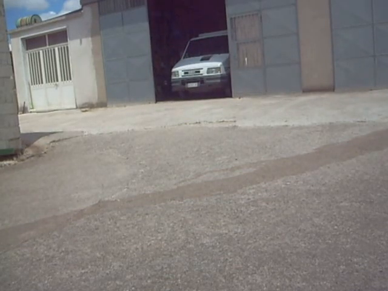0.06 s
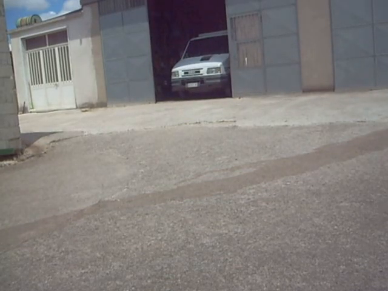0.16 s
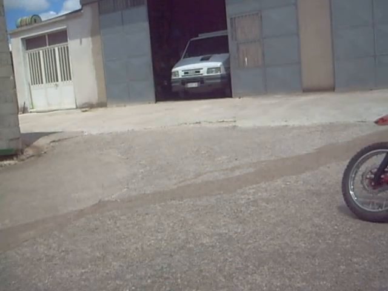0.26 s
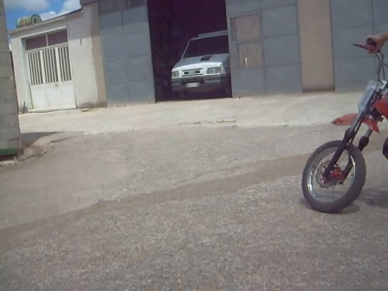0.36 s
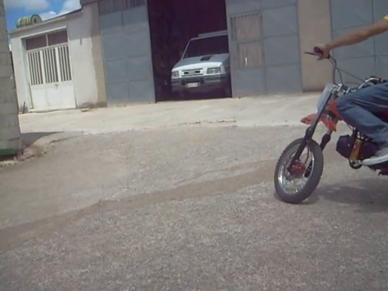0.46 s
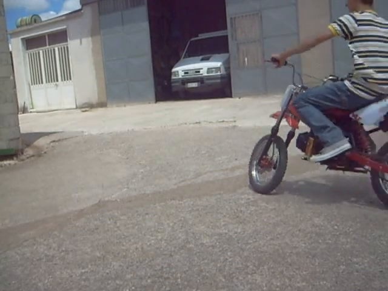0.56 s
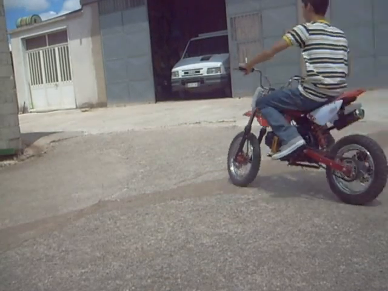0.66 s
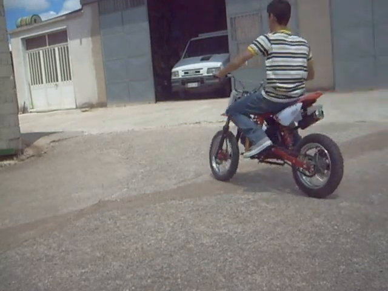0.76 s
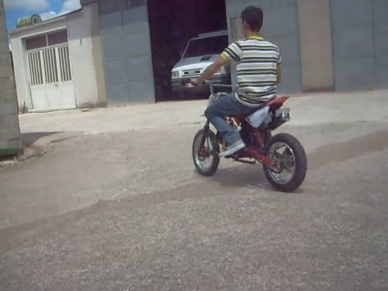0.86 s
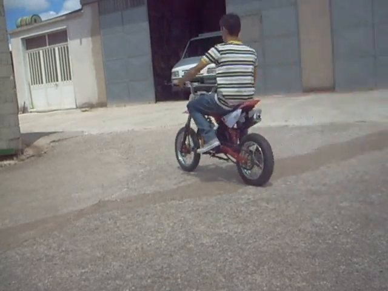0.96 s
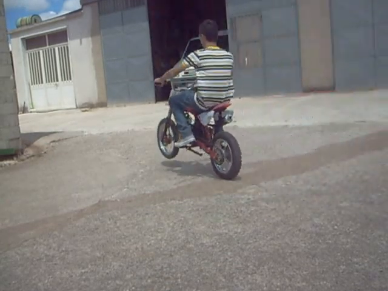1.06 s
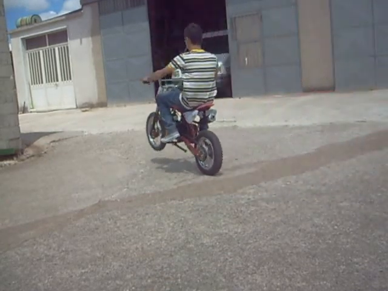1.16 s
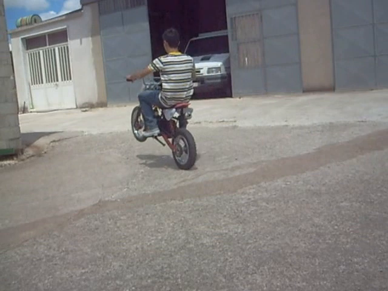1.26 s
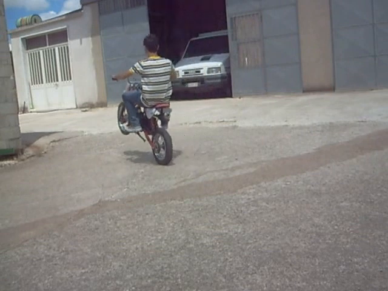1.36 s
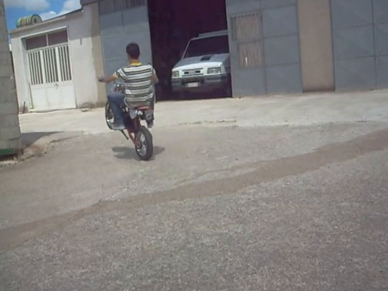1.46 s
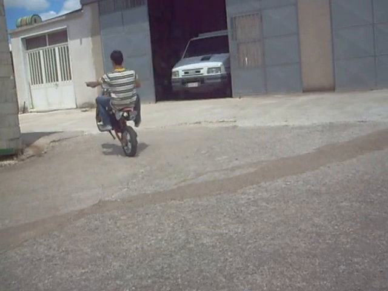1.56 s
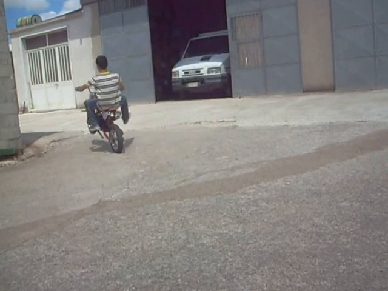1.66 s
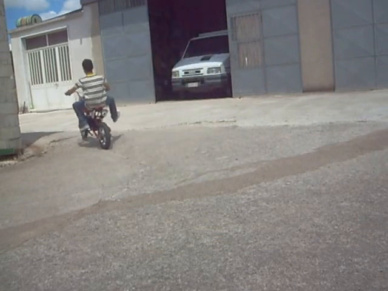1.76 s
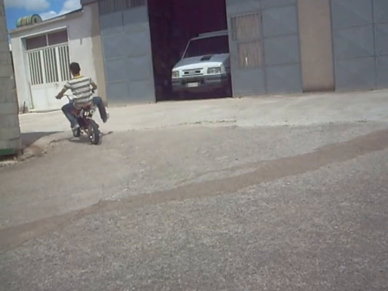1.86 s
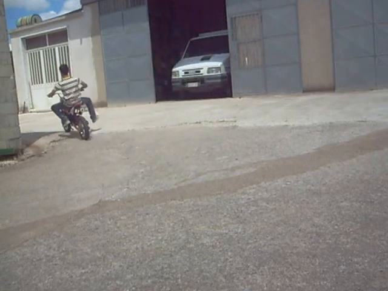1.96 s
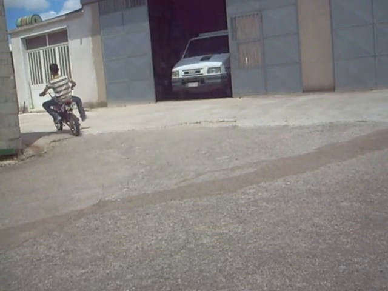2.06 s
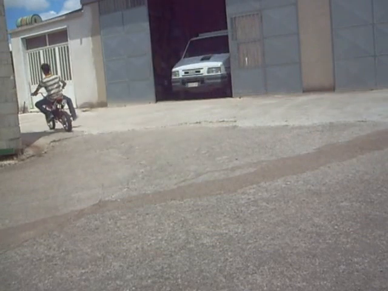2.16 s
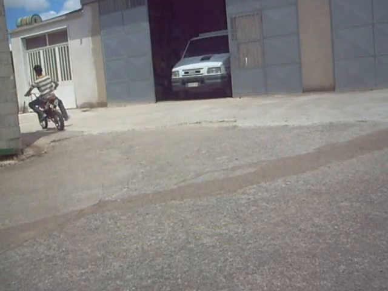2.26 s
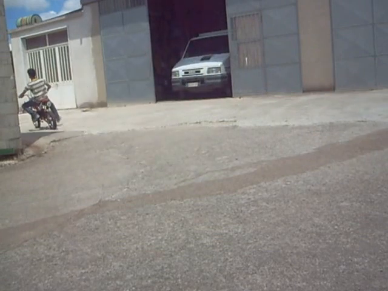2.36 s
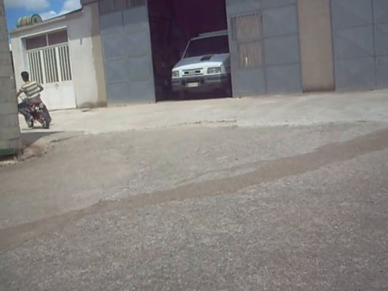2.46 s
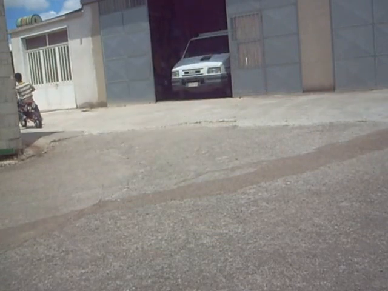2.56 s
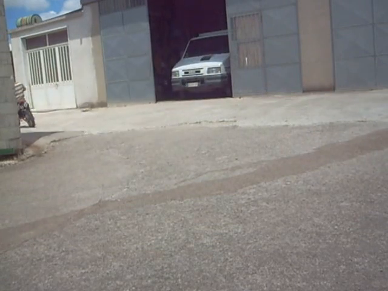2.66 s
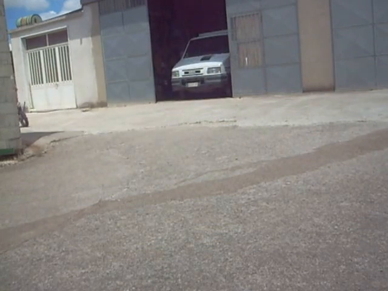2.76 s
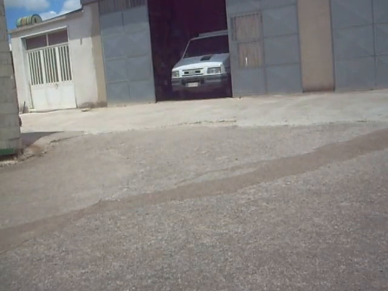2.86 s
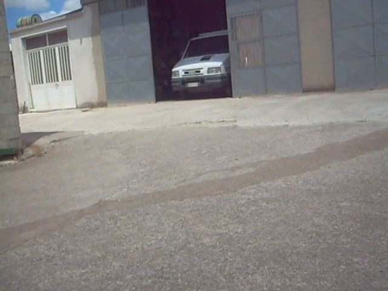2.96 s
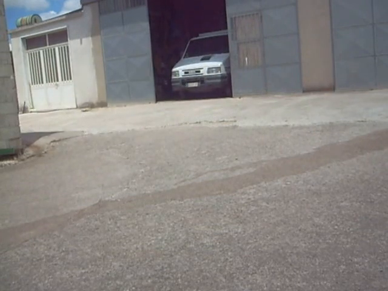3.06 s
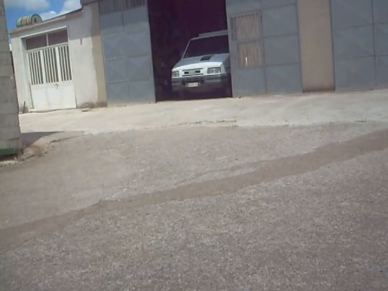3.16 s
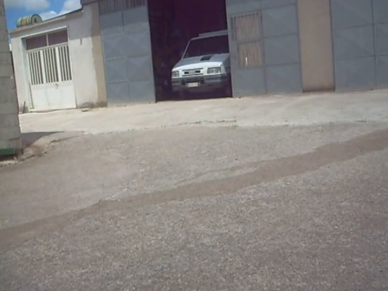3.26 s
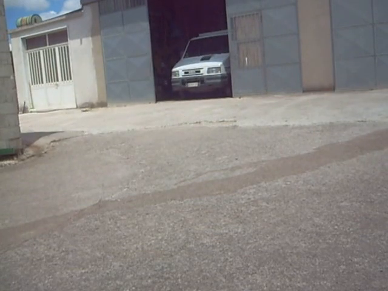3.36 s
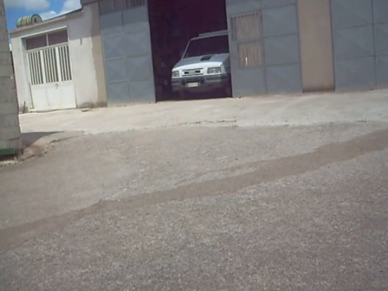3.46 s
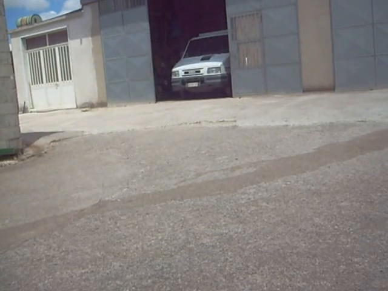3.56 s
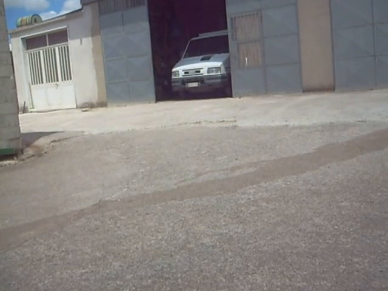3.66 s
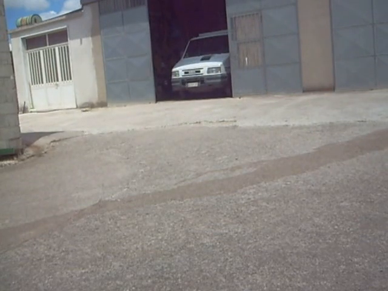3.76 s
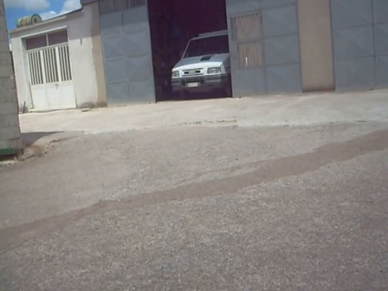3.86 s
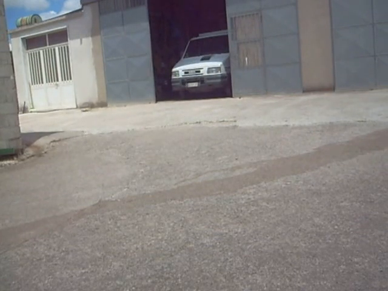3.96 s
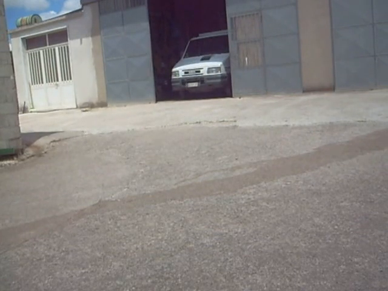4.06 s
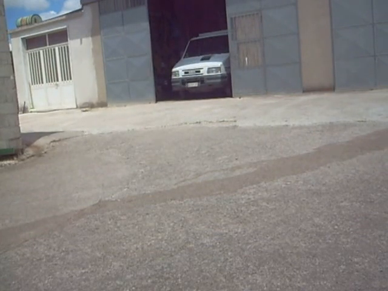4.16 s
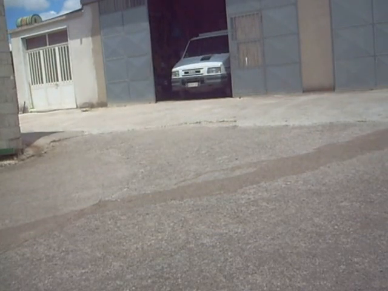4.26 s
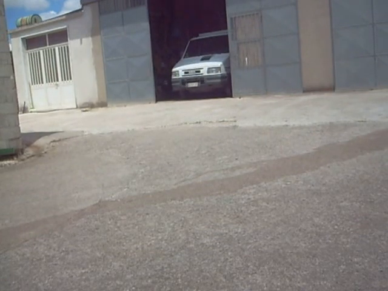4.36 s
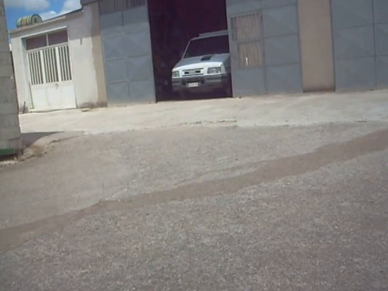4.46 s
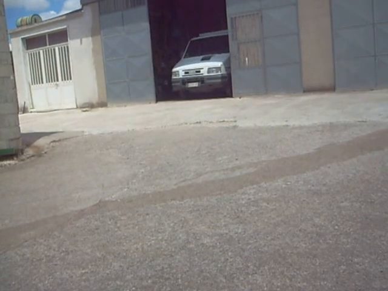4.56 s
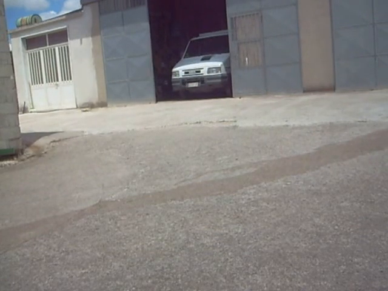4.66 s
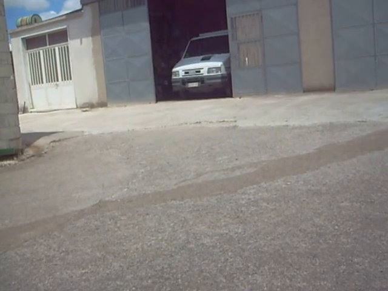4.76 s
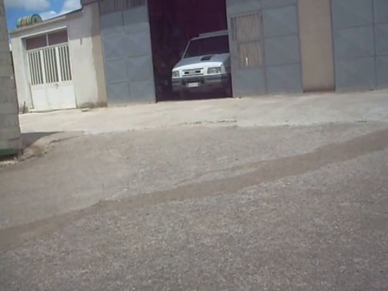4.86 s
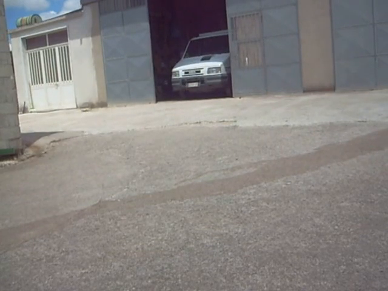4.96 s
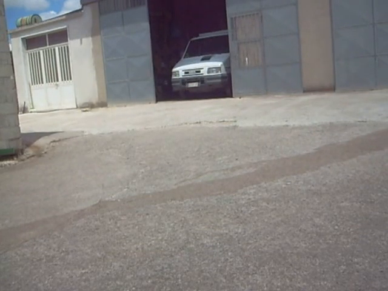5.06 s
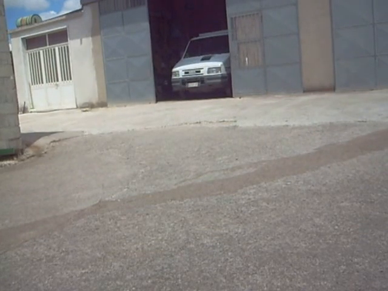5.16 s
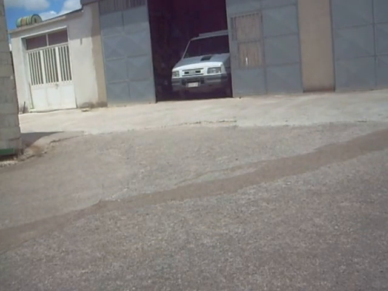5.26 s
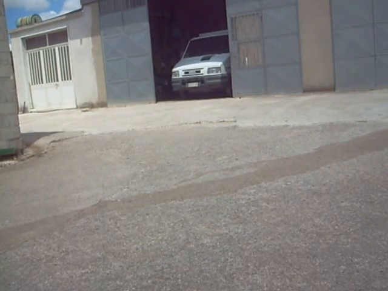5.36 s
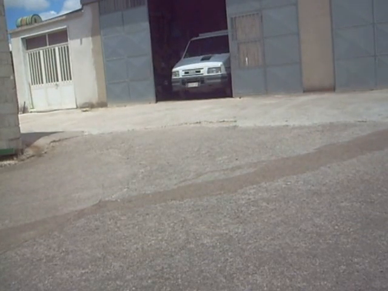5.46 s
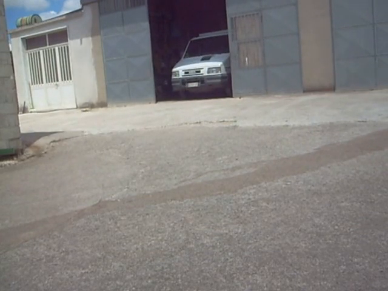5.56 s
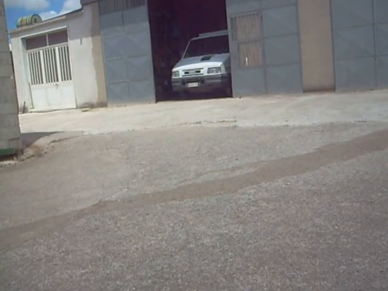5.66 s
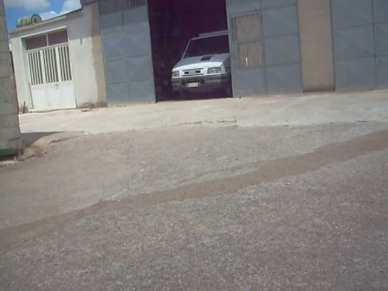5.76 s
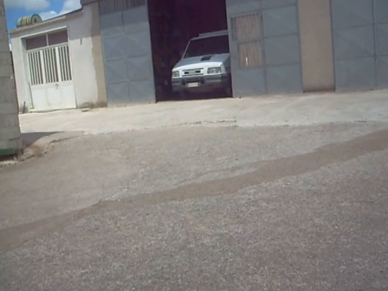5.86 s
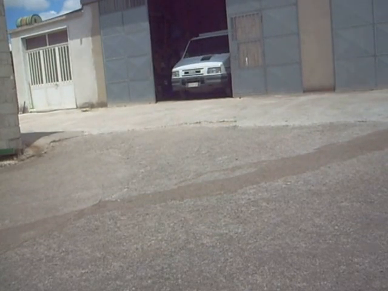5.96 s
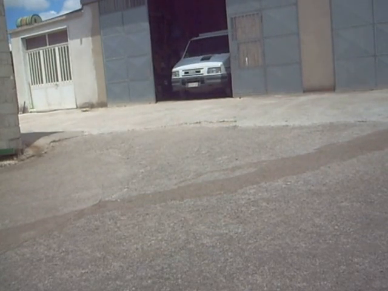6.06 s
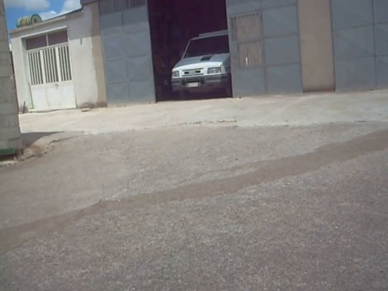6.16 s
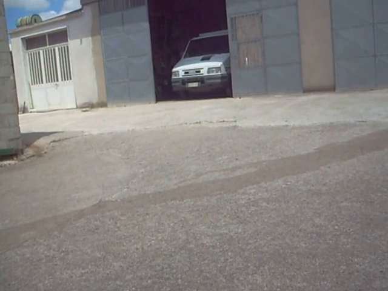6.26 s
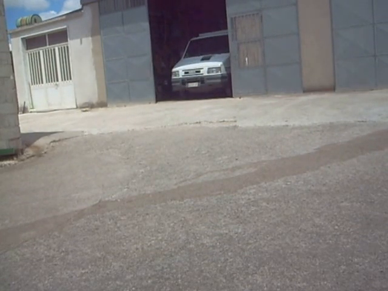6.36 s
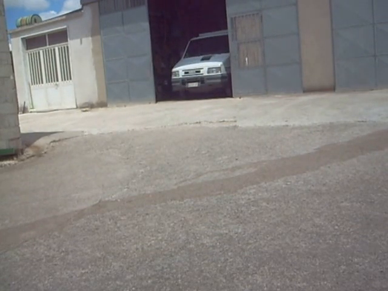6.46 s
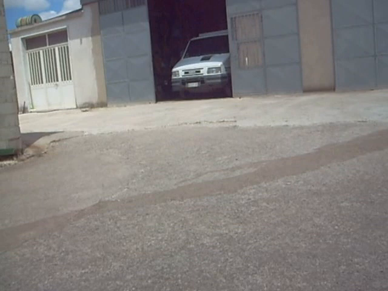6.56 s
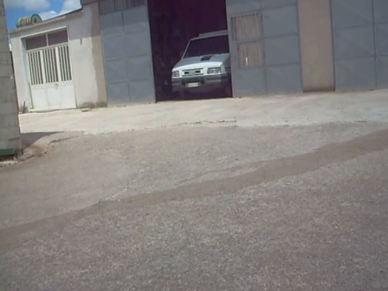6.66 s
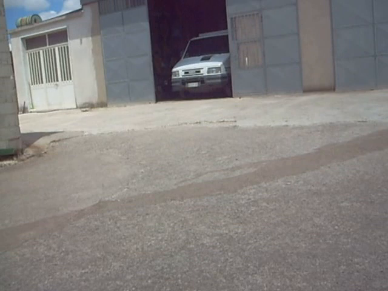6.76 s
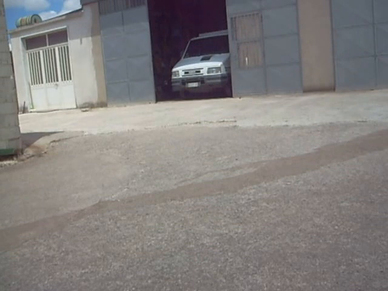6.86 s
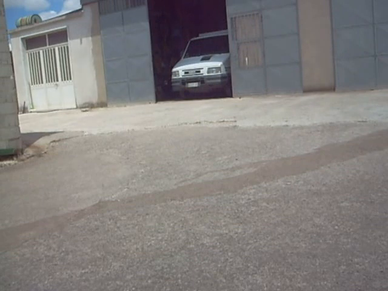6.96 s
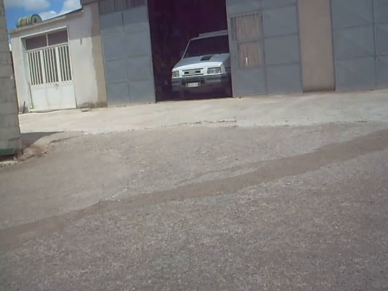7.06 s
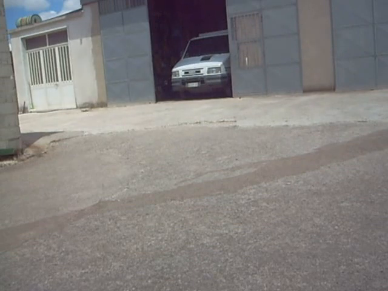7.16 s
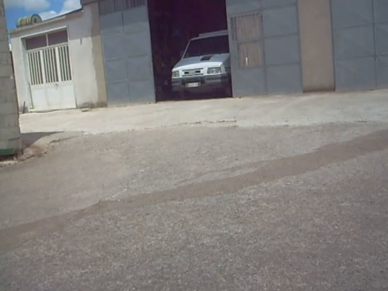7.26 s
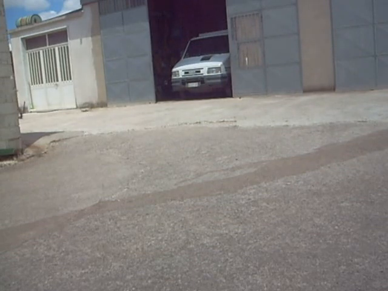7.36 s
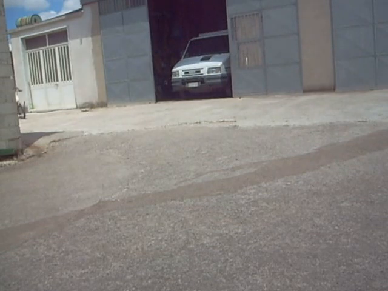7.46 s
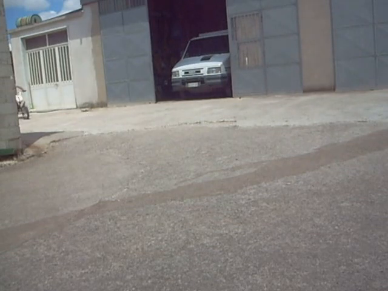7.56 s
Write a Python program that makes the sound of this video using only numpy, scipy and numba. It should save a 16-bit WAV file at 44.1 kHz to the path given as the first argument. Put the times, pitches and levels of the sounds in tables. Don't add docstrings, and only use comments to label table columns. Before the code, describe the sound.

A small single-cylinder motorbike blats close past across a concrete yard, drops to a muffled idle behind a wall, then revs twice more.

```python
import sys
import numpy as np
from scipy import signal
from scipy.fft import rfft, irfft
from scipy.io import wavfile
from scipy.ndimage import uniform_filter1d
from numba import njit

SR = 44100
rng = np.random.default_rng(int(sys.argv[2]) if len(sys.argv) > 2 else 0)


def inscribe(sig):
    pcm = np.round(np.clip(np.atleast_2d(sig).T, -1, 1) * 32767)
    wavfile.write(sys.argv[1], SR, pcm.astype(np.int16))


def attenuation_scalar(level_db):
    decades = np.asarray(level_db, float) / 20
    return 10 ** decades


N = 336042

# start_s, firing_rate_hz
FIRING_RATE = [(0.0, 15.88), (0.247, 24.45), (0.431, 12.37), (0.442, 22.81), (0.923, 17.66), (0.938, 23.11),
               (1.419, 35.8), (1.518, 29.36), (1.834, 33.6), (2.035, 29.05), (2.178, 31.6), (2.836, 14.3),
               (5.559, 16.07), (5.944, 32.85), (6.324, 27.27), (6.59, 36.3), (6.735, 16.53), (7.62, 16.07)]
# start_s, rise_s, hold_s, fall_s, load_0_to_1
TWISTS = [
    (0.096, .13, 0.054, 0.16, 0.51),
    (0.462, .025, 0.077, 0.077, 0.67),
    (0.949, 0.072, .43, 0.079, 1),
    (1.534, 0.095, 0.25, 0.076, 0.87),
    (2.028, 0.13, 0.35, 0.18, 0.08),
    (5.53, .27, 0.44, 0.23, 0.78),
    (6.276, .2, .08, 0.19, 0.94),
    (6.65, 0.061, 0.27, 0.6, .15),
    (3.2, .2, .2, 0.35, 0),
]
# start_s, level_above_usual_db
BANGS = [(0.5063, 7), (0.5483, 6.5), (0.5897, 2.5), (0.6896, 2.5), (0.8007, -10), (0.855, 4),
         (0.9598, -1.5), (1.0007, 1), (1.1723, -1.5), (1.521, 5.5), (1.6479, -3.5), (1.9601, 5),
         (2.0986, 3), (2.1987, 3), (2.6649, 1.5), (2.9682, -1), (3.334, 8.5), (3.544, 6), (3.8038, 8.5),
         (3.9406, 7), (4.1571, 1.0), (4.477, 9.5), (4.6141, 11.5), (4.7441, 11.5), (4.9363, 10),
         (5.1307, 10), (5.4474, 8), (5.801, 3.5), (7.25, 6.5), (7.4354, 6.5)]
# start_s, round_trips_hz, load_0_to_1
PIPE_NOTE = [(0, 118, 0.22), (.22, 142, 0.46), (.33, 109, 0.03), (.52, 144, 0.24), (.64, 118, 0),
             (.93, 115.4, 0.05), (1.0, 144, .55), (1.44, 158.4, .95), (1.53, 133, 0.5), (1.9, 163, .92),
             (2.0, 123, 0.05), (2.7, 104, 0.12), (5.55, 112, 0), (6.0, 182, 1), (6.3, 152, 0.75),
             (6.55, 160.5, 0.9), (6.68, 129, 0.64), (7.62, 110, 0.4)]
# frequency_hz, density_db_per_hz
SHUT_SPECTRUM = [(15, -96), (40, -13), (100, 0.5), (250, -4.5), (380, -8), (480, -25), (800, -60),
                 (1500, -18), (3000, -68)]
# frequency_hz, density_db_per_hz
OPEN_SPECTRUM = [(15, -50), (40, -5), (100, -15), (170, -3), (310, -3), (500, -8), (750, -11),
                 (1000, -46.5), (1500, -45), (3000, -88)]
# frequency_hz, density_db_per_hz
GAS_SPECTRUM = [(260, -37), (450, -19), (812, -24), (951, -24), (1290, -20), (1640, -12), (2130, -10),
                (2680, -0.5), (3620, -16), (5740, -34), (10400, -47), (12300, -64), (14000, -76)]
# start_s, distance_and_wall_gain_db, tail_pipe_facing_0_to_1
PATH = [(0, -0.5, 0.02), (.35, -1, 0.41), (.6, 1, 0.37), (.9, -0.5, 0.64), (1.1, 1.5, 1), (1.45, -2, 0.81),
        (1.7, -1.5, 0.83), (1.95, 0.5, 0.82), (2.3, -1, 0.83), (2.57, -8, 1.23), (2.8, -16, 0.9),
        (3.1, -16.5, 0.52), (4.5, -22, 0.52), (5.6, -19.5, 0.21), (6.2, -16, 0.1), (6.5, -11, 0.34),
        (6.75, -18, 0.04), (7.62, -20, 0.43)]
# onset_s, peak_db, shake_length_s
RATTLES = [(0.453, -27.5, 0.015), (0.935, -28, 0.014), (0.992, -24, 0.019), (2.239, -31, 0.016),
           (2.27, -38, 0.016), (3.016, -48.5, 0.028), (3.284, -45.5, 0.02), (3.331, -38, 0.02),
           (3.357, -60, 0.03), (5.62, -58, 0.019), (5.675, -52, 0.019)]
# frequency_hz, width_hz, level_db
METAL_MODES = [(4750, 220, 4.5), (5650, 130, 4), (6400, 360, 2), (7000, 410, 0.5), (8650, 610, -6)]
# frequency_hz, density_db_per_hz
YARD_SPECTRUM = [(15, -62), (45, -7.5), (100, 0.5), (175, -2.5), (230, 0), (370, -7), (450, -15.5),
                 (750, -19), (1480, -12.5), (2050, -16.5), (2690, -15.5), (4370, -35.5), (9840, -38),
                 (16000, -75)]


def engine(twist, facing, loss_db):
    hz, turns = crank()
    trips_hz, load = curves(PIPE_NOTE)
    load = np.clip(load, 0, 1)
    trips_hz = trips_hz * (1 + .035 * walk(25))
    crack_ms = 10.14 * np.exp(-np.clip(facing, 0, 1) * (0.44 + 1.66 * twist) - .035 * loss_db)
    phase = turns + hz * (.0001 + 0.000214 * crack_ms)
    cycle = np.floor(phase).astype(int) + 1
    scatter_db = 2.5 - 1.7 * load
    chance = rng.standard_normal((cycle[-1] + 1, 3))
    thump = exhaust_thump(cycle, scatter_db * chance[cycle, 0], trips_hz, load)

    length_ms = crack_ms * np.exp(.18 * chance[cycle, 1])
    puff = gas_puff(1000 * (phase % 1) / hz, length_ms)
    crack = gas_crack(puff, cycle, scatter_db * chance[cycle, 2])
    valves = valve_stir(phase)
    hiss_db = 4 - 2 * twist - 11.5 * facing - .15 * loss_db
    hiss = colour(attenuation_scalar(hiss_db) * valves * rng.standard_normal(N), GAS_SPECTRUM)
    gas = (crack + hiss) / np.sqrt(1 + attenuation_scalar(2 * hiss_db))
    gas = gas / np.sqrt(np.mean(colour(rng.standard_normal(N), GAS_SPECTRUM) ** 2))
    top = valve_clack(gas, phase)
    gas = whistle_and_ring(gas, load, facing)
    top_db = 10 * np.log10(np.mean(top ** 2) / np.mean(gas ** 2))
    box = air_box(puff, valves)

    burble = 1 / (.07 * SR)
    boom = np.maximum(twist, signal.lfilter([burble], [1, burble - 1], twist))
    thump_db = -36 + 11 * boom + 0.4 * facing
    gas_db = -36 + 13 * twist + 13.5 * facing
    treble_db = -32.5 + 3.5 * twist + 17 * np.clip(facing, 0, 1) + .15 * loss_db
    intake_db = -7 + 1.5 * twist - 18 * facing
    noise = gas * attenuation_scalar(-0.5) + top * attenuation_scalar(treble_db - top_db) + box * attenuation_scalar(intake_db)
    return thump * attenuation_scalar(thump_db), noise * attenuation_scalar(gas_db)


def crank():
    hz, = curves(FIRING_RATE)
    t = np.arange(N) / SR
    turns = np.cumsum(hz) / SR
    bang_s = np.transpose(BANGS)[0]
    at = np.interp(bang_s, t, turns)
    first_phase = -.0605
    shift = np.interp(t, np.r_[0, bang_s], np.r_[first_phase, np.round(at) - at])
    return hz, turns + shift


def throttle():
    t, total = np.arange(N) / SR, 0
    for start_s, rise_s, hold_s, fall_s, load in TWISTS:
        corners_s = start_s + np.cumsum([0, rise_s, hold_s, fall_s])
        total = total + load * np.interp(t, corners_s, [0, 1, 1, 0])
    return np.clip(total, 0, 1)


def exhaust_thump(cycle, scatter_db, trips_hz, load):
    fired = np.diff(cycle, prepend=cycle[0]) * attenuation_scalar(.5 * scatter_db)
    fired = np.roll(fired, 40)
    ringing = pipe(fired, SR / trips_hz, 0.385, 0.46)
    shut = steady(colour(ringing, SHUT_SPECTRUM))
    wide_open = steady(colour(ringing, OPEN_SPECTRUM))
    return steady((1 - load) * shut + load * wide_open)


def gas_puff(since_ms, length_ms):
    rise = 1 - np.exp(-(since_ms / (0.45 * length_ms)) ** 2)
    return steady(rise * np.exp(-since_ms / length_ms))


def gas_crack(puff, cycle, strength_db):
    for start_s, extra_db in BANGS:
        strength_db[cycle == cycle[int((start_s + .012) * SR)]] = extra_db
    noise = colour(puff * rng.standard_normal(N), GAS_SPECTRUM)
    return even(noise, cycle, 0.41) * attenuation_scalar(strength_db)


def valve_stir(phase):
    return attenuation_scalar(1.0 * np.cos(4 * np.pi * (phase - .08)) + 4.1 * walk(130))


def valve_clack(gas, phase):
    top = signal.sosfilt(signal.butter(3, 4300, "high", fs=SR, output="sos"), gas)
    return top * (1 + 4 * np.exp(-((phase % 1 - .45) / 0.055) ** 2))


def whistle_and_ring(gas, load, facing):
    gas = gas + 0.39 * load * resonate(gas, 3400, 850)
    return gas + 0.49 * (1 - load) * (.3 + facing) * resonate(gas, 2750, 260)


def air_box(puff, valves):
    return steady(resonate((puff + .5 * valves) * rng.standard_normal(N), 1050, 240))


@njit
def pipe(x, lag, back, damp):
    y, soft = np.zeros(len(x)), 0.
    for i in range(len(x)):
        at = max(i - lag[i], 0.)
        j = int(at)
        delayed = y[j] + (at - j) * (y[j + 1] - y[j])
        soft += (1 - damp) * (delayed - soft)
        y[i] = x[i] + back * soft
    return y


def rattles():
    t, shake = np.arange(N) / SR, 0
    for onset_s, peak_db, length_s in RATTLES:
        onset = np.clip((t - onset_s) / 0.0057, 0, 1)
        shake = shake + attenuation_scalar(peak_db) * onset * np.exp(-np.abs(t - onset_s) / length_s)
    knocks = shake * rng.standard_normal(N) * attenuation_scalar(2 * walk(300))
    knocks = signal.lfilter(*signal.butter(2, 7500, fs=SR), knocks)
    return attenuation_scalar(4.5) * sum(attenuation_scalar(db) * resonate(knocks, hz, width_hz) for hz, width_hz, db in METAL_MODES)


def ground_bounce(x, loss_db):
    lag_ms = 0.28 + 0.37 * attenuation_scalar(loss_db)
    return pipe(x, lag_ms * (1 + 0.16 * walk(25)) * SR / 1000, 0.12, 0.24)


def wall_flutter(thump, load, loss_db):
    slap_ms = 17.5 - 5.5 * load
    flutter = pipe(thump, slap_ms * SR / 1000, 0.41, 0.31) - thump
    return flutter * attenuation_scalar(-0.26 * loss_db)


def shed_echo(x, load, loss_db):
    echo_db = -13.5 + 3 * load - 0.31 * loss_db
    t60_s = .55
    lags = rng.integers(500, 3500, 8)
    return walls(x * attenuation_scalar(echo_db), lags, attenuation_scalar(-60 * lags / SR / t60_s), .4)


@njit
def walls(x, lags, gain, damp):
    line, soft, out = np.zeros((8, 8192)), np.zeros(8), np.zeros(len(x))
    for i in range(len(x)):
        total = 0.
        for k in range(8):
            soft[k] += (1 - damp) * (gain[k] * line[k, (i - lags[k]) & 8191] - soft[k])
            total += soft[k]
        out[i] = soft[0] - soft[3] + soft[5] - soft[6]
        for k in range(8):
            line[k, i & 8191] = x[i] + soft[k] - total / 4
    return out


def yard():
    hum = colour(rng.standard_normal(N), YARD_SPECTRUM) * attenuation_scalar(1.2 * walk(4))
    return hum * attenuation_scalar(-51) / np.sqrt(np.mean(hum ** 2))


def curves(table):
    s, *columns = np.transpose(table)
    return [np.interp(np.arange(N) / SR, s, c) for c in columns]


def steady(x, span_s=0.062):
    k = int(span_s * SR)
    power = uniform_filter1d(uniform_filter1d(x ** 2, k), k)
    return x / np.sqrt(power + 1e-18)


def even(x, cycle, share):
    energy = np.bincount(cycle, x ** 2) + 1e-18
    gain = (uniform_filter1d(energy, size=5) / energy) ** (share / 2)
    return x * gain[cycle]


def resonate(x, hz, width_hz):
    return signal.lfilter(*signal.iirpeak(hz, hz / width_hz, SR), x)


def colour(x, points, size=4096):
    hz, db = np.transpose(points)
    bins_hz = np.arange(size // 2 + 1) * SR / size
    log_gain = np.interp(np.log(bins_hz + 1), np.log(hz), db) * np.log(10) / 20
    cepstrum = irfft(log_gain)
    cepstrum[1:size // 2] *= 2
    cepstrum[size // 2 + 1:] = 0
    return signal.fftconvolve(x, irfft(np.exp(rfft(cepstrum))))[:N]


def walk(rate_hz):
    k = int(SR / rate_hz)
    held = np.repeat(rng.standard_normal(N // k + 1), k)
    return uniform_filter1d(uniform_filter1d(held, k), k)[:N]


def scene():
    loss_db, facing = curves(PATH)
    load = throttle()
    thump, gas = engine(load, facing, loss_db)
    thump, gas = thump * attenuation_scalar(loss_db), gas * attenuation_scalar(loss_db)
    bright = ground_bounce(gas + rattles(), loss_db)
    flutter = wall_flutter(thump, load, loss_db)
    echo = shed_echo(thump + bright, load, loss_db)
    return (thump + flutter + bright + echo + yard())[None]


def low_pass(x):
    return signal.sosfilt(signal.butter(12, 16410, fs=SR, output="sos"), x)


def record(dry):
    capsule = signal.sosfilt(signal.butter(2, 45, "high", fs=SR, output="sos"), dry)
    clipped = np.clip(capsule, -.87, .87)
    soft = signal.sosfilt(signal.butter(4, 10340, fs=SR, output="sos"), clipped)
    hiss = signal.sosfilt(signal.butter(6, 12200, fs=SR, output="sos"), rng.standard_normal(dry.shape))
    return low_pass(soft + attenuation_scalar(-79) * hiss)


dry = scene()
out = record(dry)
inscribe(out)
```